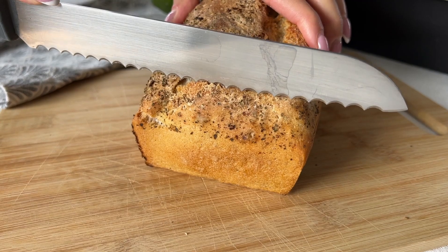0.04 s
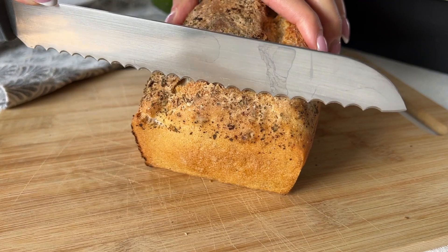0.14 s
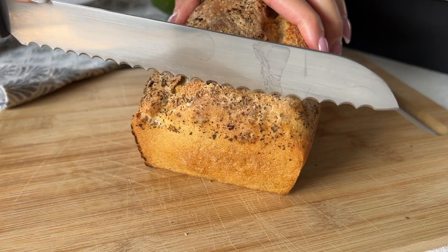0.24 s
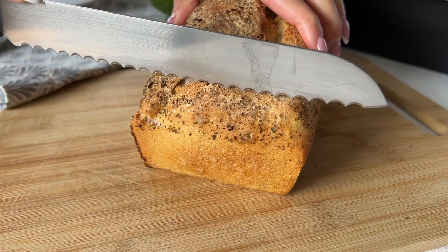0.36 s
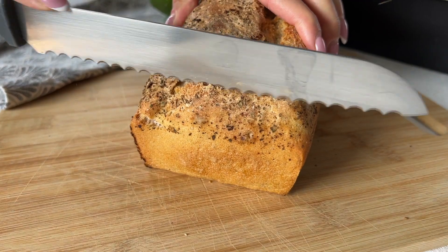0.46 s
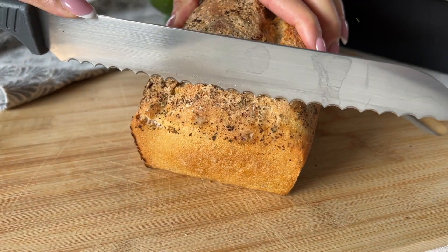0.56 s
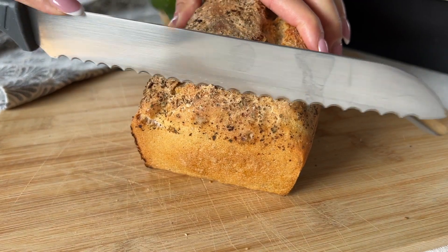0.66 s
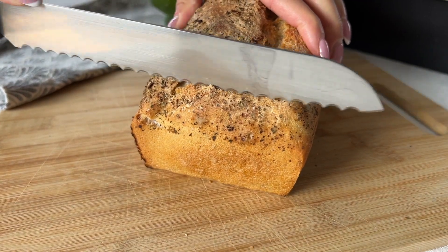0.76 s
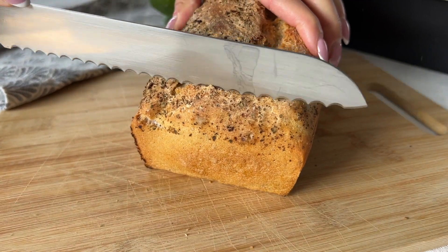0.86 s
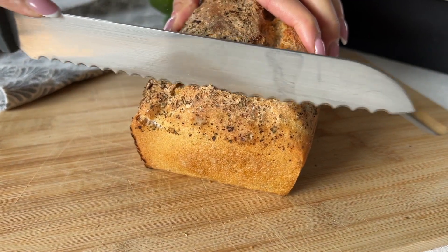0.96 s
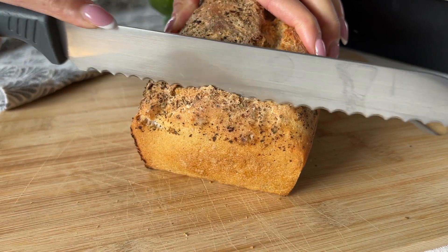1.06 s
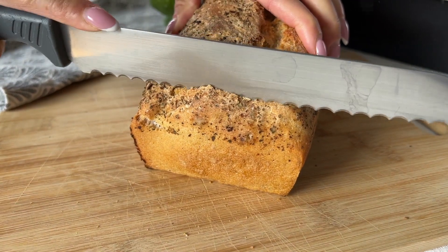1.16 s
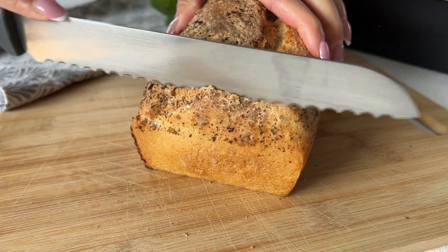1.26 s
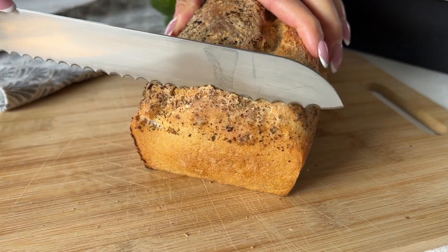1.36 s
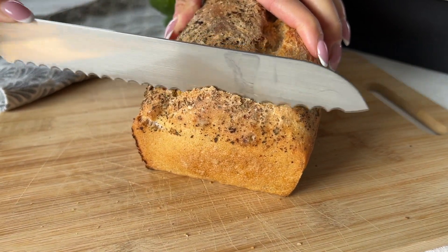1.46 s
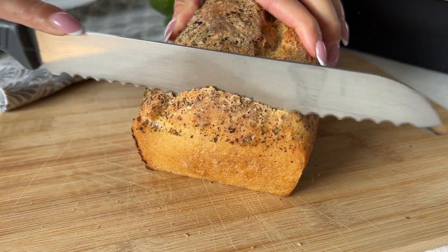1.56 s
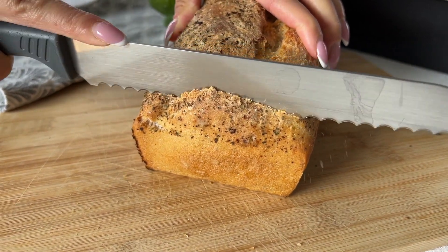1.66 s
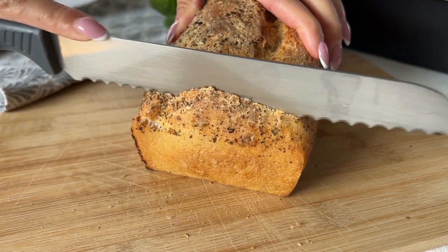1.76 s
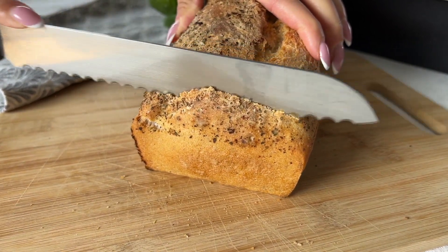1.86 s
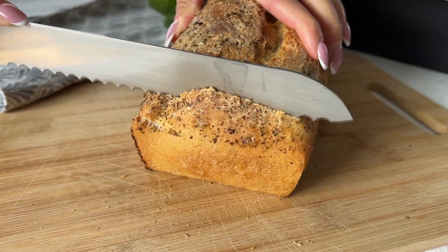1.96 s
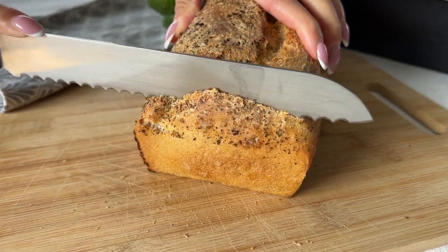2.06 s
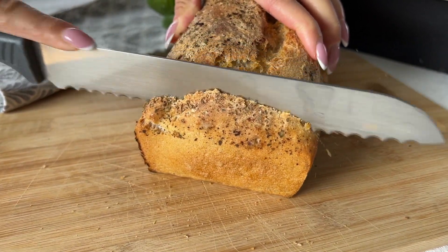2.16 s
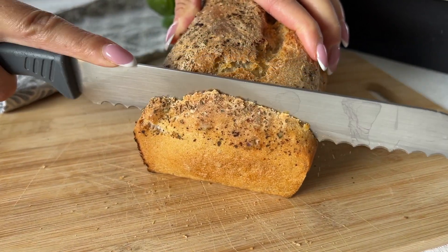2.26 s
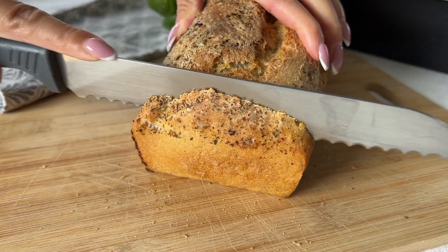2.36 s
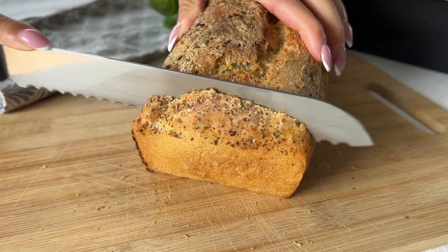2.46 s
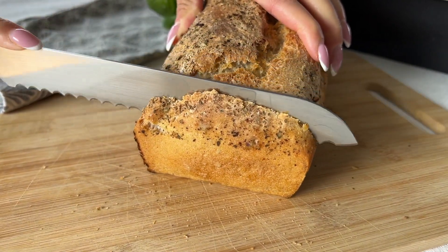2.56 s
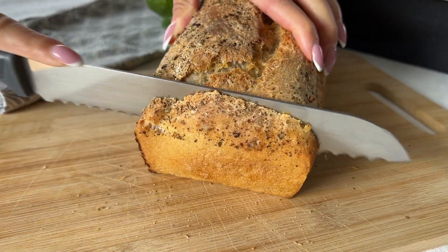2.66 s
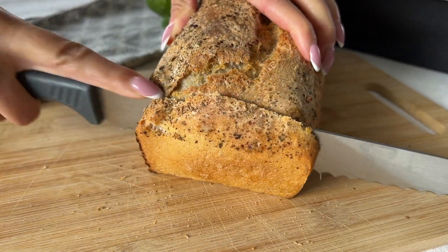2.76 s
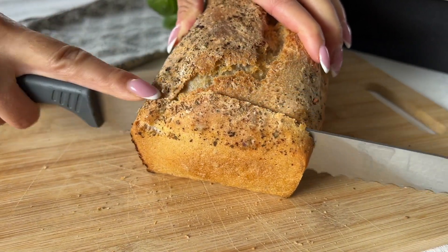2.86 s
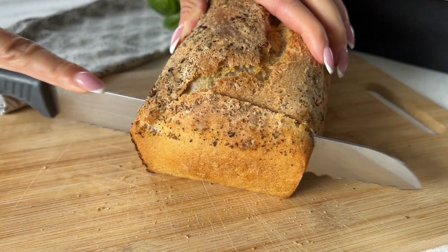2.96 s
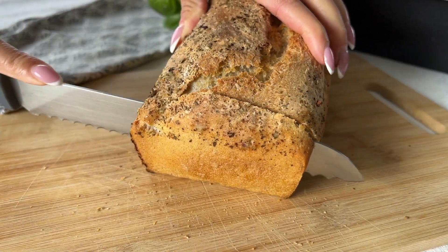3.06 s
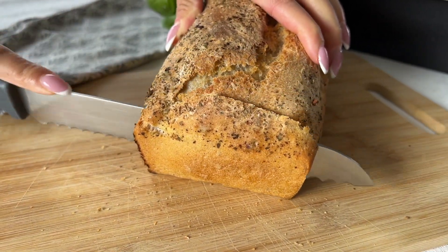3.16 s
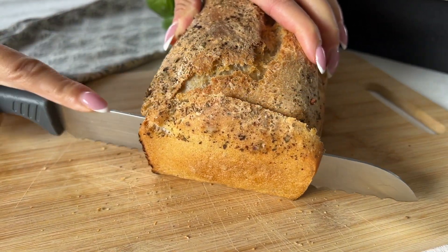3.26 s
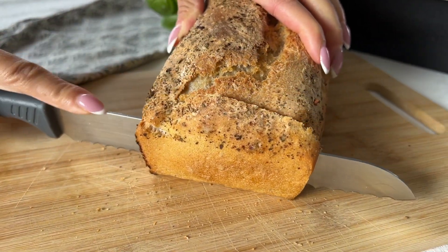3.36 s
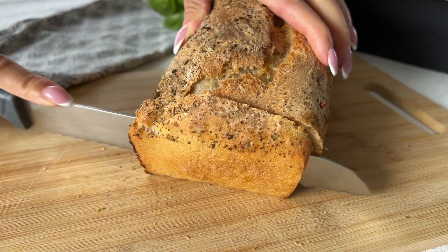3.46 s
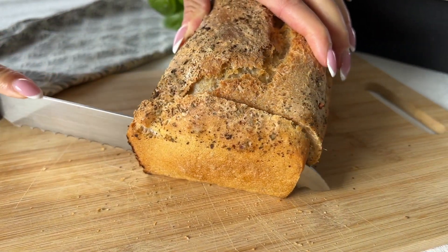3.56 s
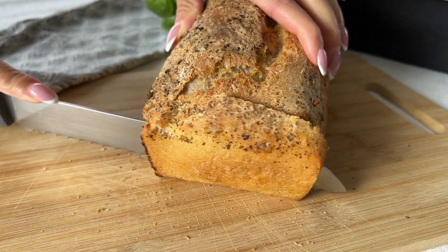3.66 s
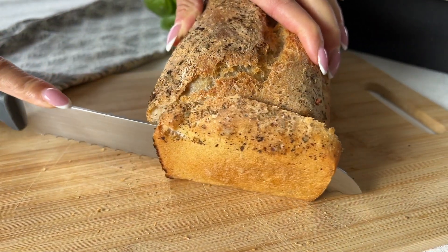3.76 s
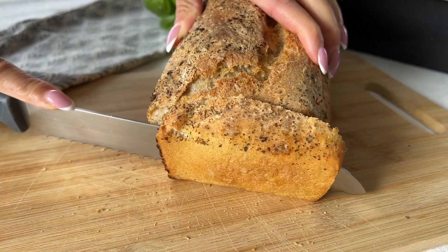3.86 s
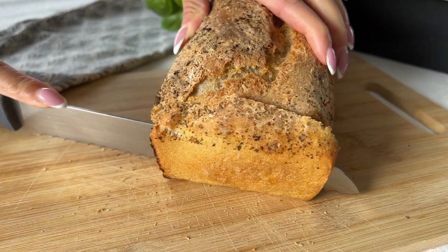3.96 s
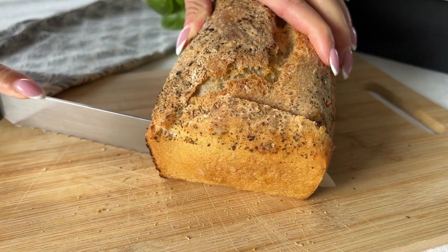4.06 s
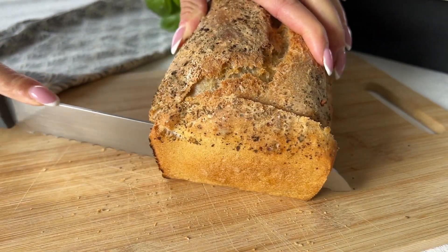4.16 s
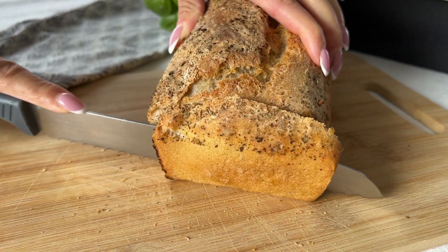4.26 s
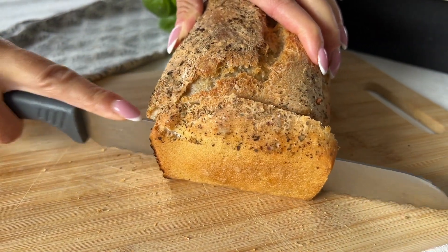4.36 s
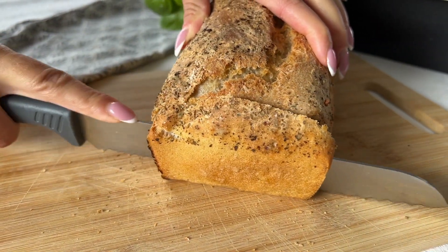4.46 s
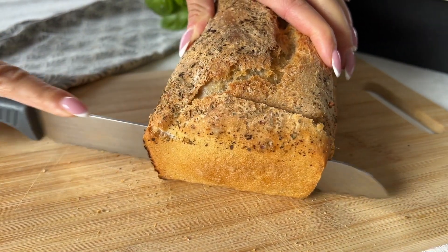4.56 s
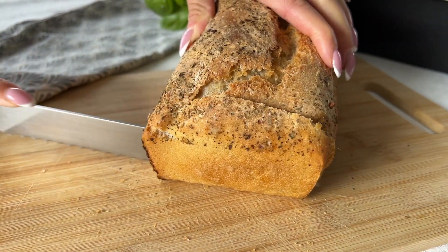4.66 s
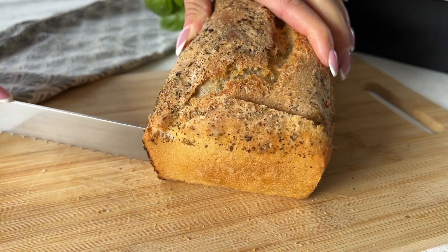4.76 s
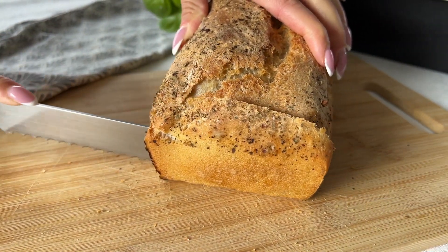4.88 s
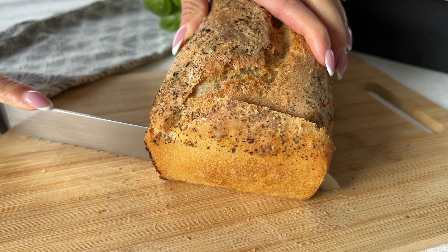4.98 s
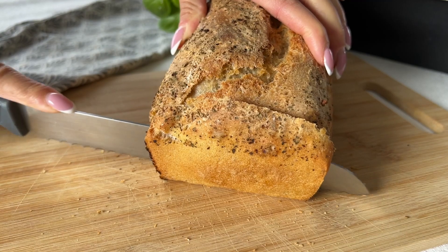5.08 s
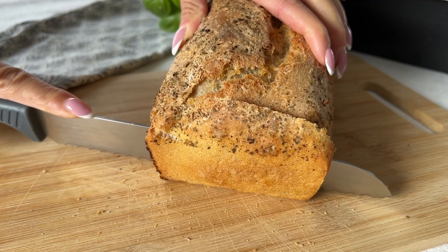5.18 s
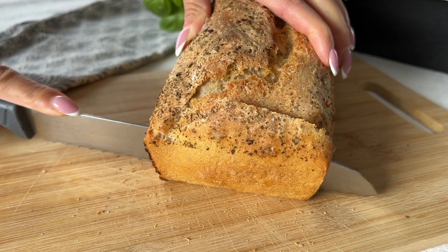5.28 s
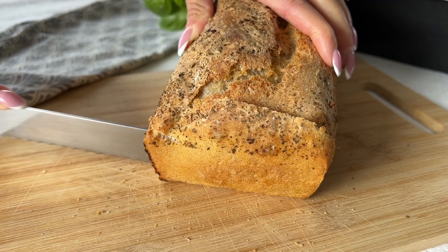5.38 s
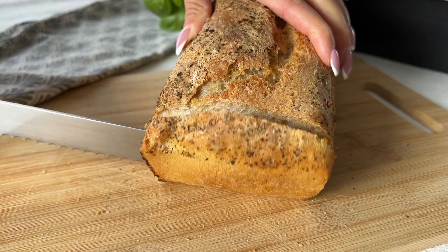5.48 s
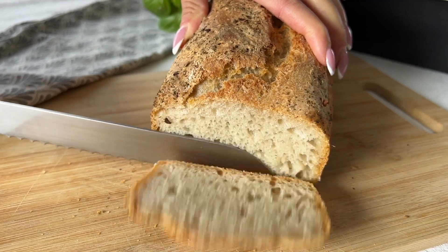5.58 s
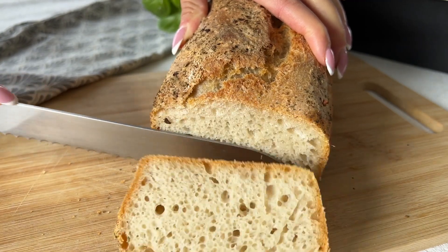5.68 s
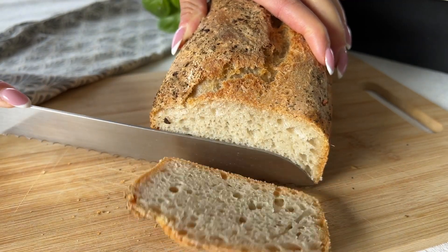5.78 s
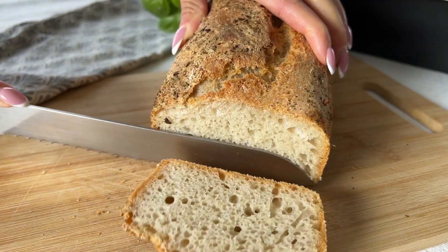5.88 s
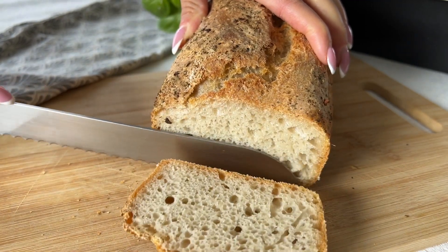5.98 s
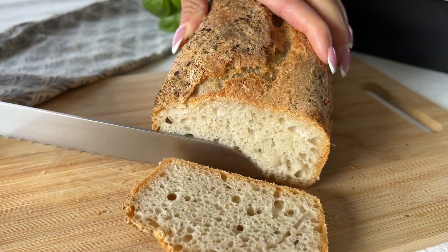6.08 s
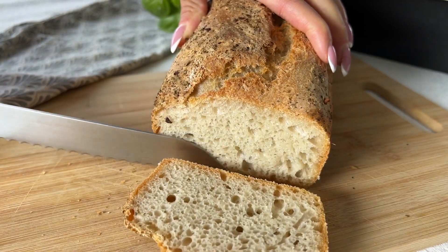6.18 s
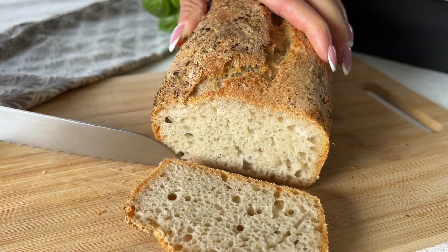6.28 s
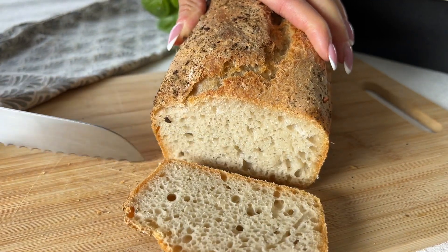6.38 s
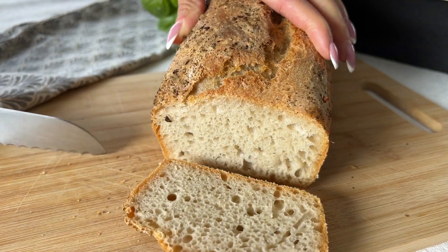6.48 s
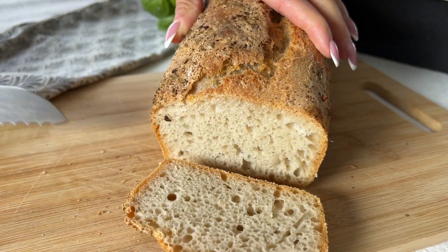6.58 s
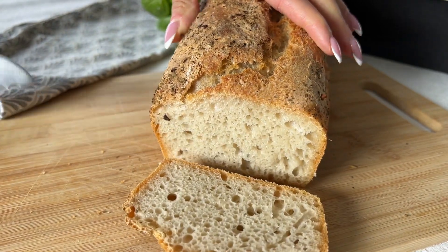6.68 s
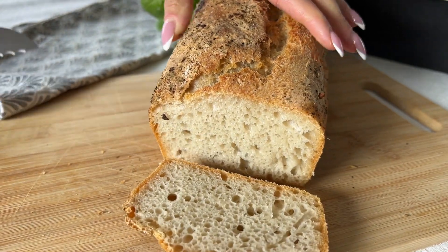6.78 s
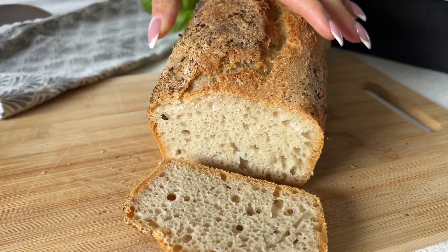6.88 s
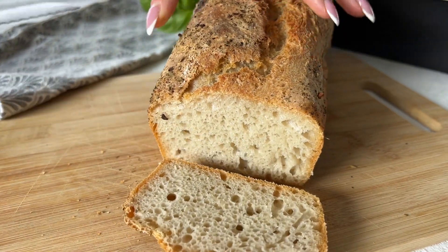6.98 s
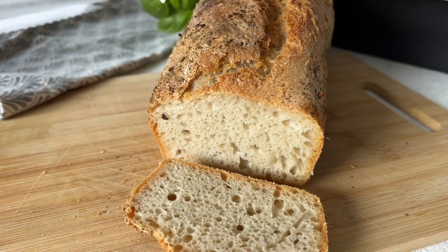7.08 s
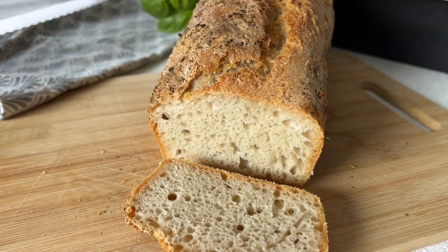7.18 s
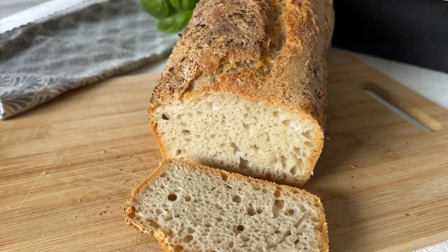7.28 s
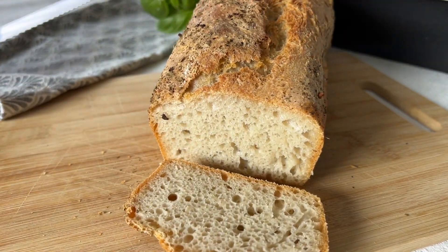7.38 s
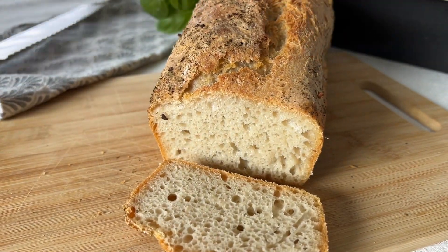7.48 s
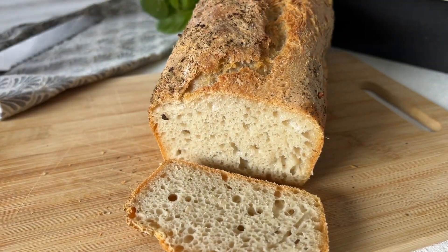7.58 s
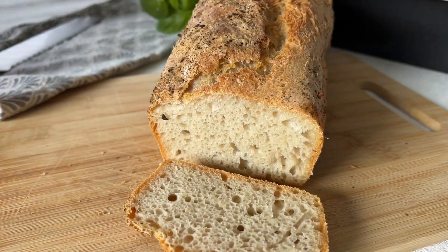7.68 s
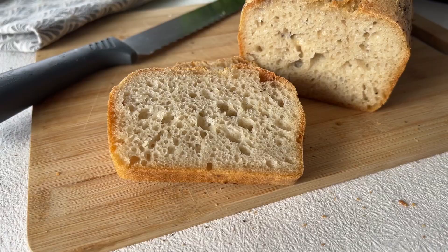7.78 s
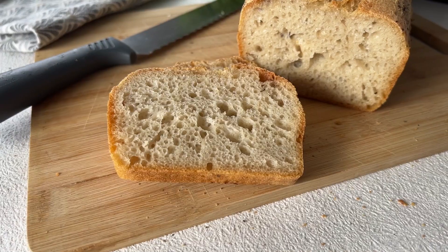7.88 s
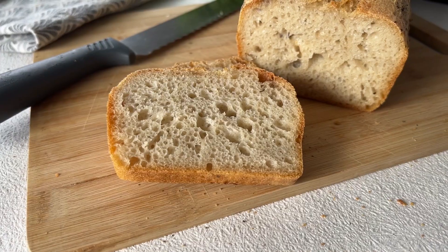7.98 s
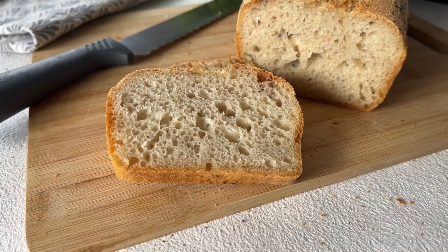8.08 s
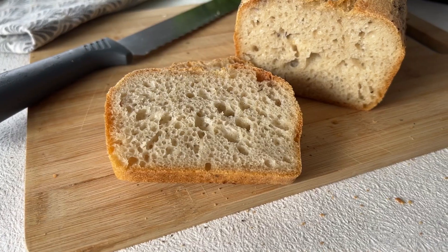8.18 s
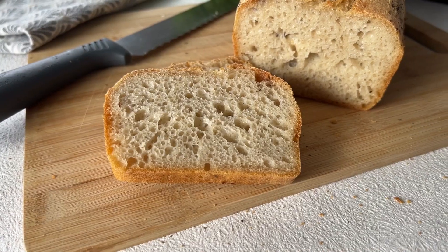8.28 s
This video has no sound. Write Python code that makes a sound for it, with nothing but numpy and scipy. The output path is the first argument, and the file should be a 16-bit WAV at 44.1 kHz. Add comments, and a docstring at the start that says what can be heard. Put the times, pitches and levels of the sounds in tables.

```python
"""In a quiet kitchen, a serrated knife saws a slice off a crusty loaf on a wooden board.
Brittle fracture of the crust gives cracks and crackle; stick-slip friction in the crumb and on the
board gives a rasp that dulls with depth. The blade's resonances change as it is drawn free.
The sawing and a few dull thumps excite low modes of counter and room. A faint hiss lies beneath,
and all sound is cut off shortly before the end."""
import sys
import numpy as np
from scipy import signal
from scipy.io import wavfile
from scipy.ndimage import uniform_filter1d

SR = 44100
rng = np.random.default_rng(int(sys.argv[2]) if len(sys.argv) > 2 else 0)


def store_wav(level_fs):
    """Save 16-bit WAV to argv[1]."""
    pcm = np.round(np.clip(np.atleast_2d(level_fs), -1, 1) * 32767)
    wavfile.write(sys.argv[1], SR, pcm.T.astype(np.int16))


N = 367749

# saw strokes: bite t/s, duration/s, rasp level/dB, crackle level/dB, swell over the stroke/dB
STROKES = [(0.135, 0.028, -69.5, -80, 3), (0.312, 0.0083, -44.5, -52, -10.5),
           (0.404, 0.093, -37.5, -32.5, 3), (0.683, 0.11, -41.5, -48.5, 0),
           (0.918, 0.16, -41.5, -40.5, 0.5), (1.228, 0.1, -36, -42, 0.5), (1.477, 0.17, -42.5, -39, -2.5),
           (1.769, 0.095, -42.5, -44, 6.5), (1.975, 0.034, -58, -59, 13), (2.082, .16, -45, -43, -0.5),
           (2.32, .05, -60.5, -59, -9), (2.4, 0.056, -42, -49, 4.5), (2.626, 0.13, -41.5, -46, -0.5),
           (2.887, 0.15, -52, -59, -1), (3.197, 0.06, -50, -58, 3.5), (3.355, 0.064, -75, -68.5, 14),
           (3.467, 0.049, -46.5, -54.5, 2.5), (3.649, 0.12, -64.5, -61.5, -7),
           (3.985, 0.048, -64, -65.5, -8.5), (4.182, 0.046, -58, -62, 1.5), (4.321, 0.029, -35.5, -43.5, 4),
           (4.509, .2, -38, -50.5, -0.5), (4.83, 0.096, -48, -54.5, 0.5), (5.027, 0.11, -48, -55.5, 4.5),
           (5.334, 0.11, -36.5, -47, -3), (5.578, 0.16, -52.5, -57, 5), (5.999, 0.21, -48.5, -61, 1),
           (6.236, .25, -44, -55, 2.5), (6.558, 0.036, -61, -77, 1.5)]
# path of the blade: t/s, depth (0 top crust, 1 board)
BLADE_DEPTH = [(0, 0.01), (2.4, 0.17), (2.9, 0.46), (3.4, 0.91), (3.9, 0.43), (4.3, 0.91)]
# single cracks of crust: t/s, snap level/dB (before filtering), knock level/dB, knock f/Hz
CRACKS = [(0.0802, -24.5, -37, 1800), (0.2184, -22, -42, 250), (0.2576, -26, -30.5, 604),
          (0.2933, -27, -26.5, 347), (0.3094, -34, -26, 345), (0.3676, -20.5, -32, 630),
          (0.386, -16.5, -38, 638), (0.4155, -16, -41, 640), (0.447, -21, -29.5, 1190),
          (0.4633, -13, -47.5, 608), (0.477, -30, -27.5, 1080), (0.5492, -24.5, -46, 471),
          (0.6404, -42, -42, 589), (0.6599, -14.5, -32, 304), (0.7022, -17.5, -34.5, 1150),
          (0.7492, -22, -23.5, 617), (0.9028, -24, -42, 627), (0.9577, -31, -46, 615),
          (0.9824, -17.5, -44.5, 250), (1.0181, -14, -36, 615), (1.0596, -10.5, -46.5, 650),
          (1.076, -16, -45, 301), (1.0884, -15, -41.5, 490), (1.1767, -40, -33, 250),
          (1.205, -29, -40.5, 907), (1.2322, -30, -32, 799), (1.4331, -15.5, -32, 291),
          (1.4479, -14, -27.5, 1550), (1.4751, -25, -30, 608), (1.486, -11.5, -26.5, 1000),
          (1.5022, -22, -35, 626), (1.5394, -16.5, -24, 580), (1.5813, -18, -25, 350),
          (1.6028, -18, -42, 1020), (1.624, -17, -52, 583), (1.7515, -19.5, -35, 312),
          (1.8148, -20, -37, 570), (1.8282, -23, -34, 1020), (1.8362, -18.5, -35, 500),
          (2.0298, -31, -45, 1160), (2.0749, -28, -35, 353), (2.0892, -17.5, -33, 440),
          (2.123, -20.5, -39, 350), (2.1555, -24, -34, 910), (2.175, -14.5, -29, 1280),
          (2.2072, -20, -46, 455), (2.2306, -23, -32.5, 458), (2.388, -16.5, -24, 2030),
          (2.4397, -33, -54, 1050), (2.4598, -26, -42, 295), (2.5826, -28.5, -40, 385),
          (2.6194, -24, -61, 641), (2.6264, -21, -42, 587), (2.6811, -17.5, -31, 1120),
          (2.6988, -24.5, -32, 611), (2.7868, -30.5, -29.5, 630), (2.8143, -31.5, -41, 2180),
          (2.8754, -39, -32.5, 980), (2.8903, -30.5, -52, 1150), (2.937, -38, -49, 546),
          (2.971, -31, -42, 336), (2.9874, -29.5, -46, 264), (3.052, -37, -65, 283),
          (3.0929, -40, -48.5, 814), (3.21, -27.5, -38, 619), (3.2323, -36, -43, 1070),
          (3.2537, -25.5, -40, 630), (3.463, -35, -53, 689), (3.4914, -36.5, -45, 832),
          (3.6556, -37, -43, 1150), (3.6689, -25.5, -61, 1820), (4.7983, -42, -48, 250),
          (5.5895, -41, -47, 350), (5.7277, -39, -59, 283), (5.8113, -42, -45, 2220),
          (5.8428, -37, -47, 2120), (5.9971, -47, -63, 571), (6.112, -44, -46, 266.5),
          (6.2098, -39, -43, 250), (6.279, -36, -52, 345), (6.6484, -53, -56, 250), (6.6827, -53, -60, 251)]
# friction spectra high in the loaf and down at the board: f/Hz, relative level/dB
RASP_TOP = [(71, -30), (120, -1.5), (210, -3), (418, -4.5), (1030, -4.5), (1390, -9.5), (1810, -8.5),
            (2850, -16), (3440, -13), (5000, -24), (6500, -51), (11000, -120)]
RASP_BOARD = [(71, -64.5), (120, -14.5), (239, 0), (394, -3), (612, -2), (936, -6), (1240, -7),
              (1610, -11.5), (3210, -23), (4000, -26), (5200, -36), (8800, -120)]
# spectra of breaking crust and of steel scraping crumb and wood: f/Hz, relative level/dB
FRACTURE = [(1470, -11), (2500, -7), (4260, -9), (7190, 1.5), (8860, -7), (10300, -6), (11200, -12),
            (11600, -8), (12500, -8), (13800, 0.5), (15800, 3.5)]
SCRAPE = [(1500, -9), (2300, 4.5), (3400, 0.5), (4000, -6), (7500, -6), (9000, -15), (12000, -20),
          (15000, -11), (16000, -28)]
# modes of the loaf on its board and of the blade:
# f/Hz, width/Hz, lift in the crust/dB, lift at the board/dB, lift when drawn free/dB
LOAF_MODES = [(171, 17, 10, .1, 15.8), (226, 40, 8, 7, 1.7), (357, 50, 4, .1, 9.2),
              (621.5, 160, 5.5, 4, 8.2), (716, 47, -6.5, 2, .1), (786, 26, -9.5, 5.7, 7.1),
              (1097, 280, 5, 1.3, 4.4), (1251, 82, -4, 6.8, 2.2), (1400, 66, -4, .1, 13),
              (1586, 66, 0, 4, 7), (1840, 92, -6.5, 6.4, 1)]
BLADE_MODES = [(2250, 190, -0.5, 4.3, 2), (3010, 110, -4.5, .1, 3.7), (3070, 100, -5.5, .1, 7.5),
               (3142, 70, -5, 6.9, 0.085), (3410, 230, 10, 7.6, 0.11), (4330, 90, -0.5, 5, 15),
               (4980, 250, 4.7, 4.6, 2.5), (5520, 170, 8.5, 8.1, 2.5), (6050, 70, 8, 4, 14),
               (6310, 93, 5, 6.2, 11), (6560, 44, 8.5, 8, 3), (7460, 170, 7, 3.3, 12),
               (8000, 60, 6.5, 1.5, 3), (8560, 160, 0.5, 2.6, 6.8), (9700, 150, 7.5, 7.5, 6.3),
               (10500, 170, 3.5, 1.5, 6.5), (11700, 160, 7, 2.8, 3.4), (13740, 300, 2.5, 3, 8),
               (15200, 50, 2.5, .1, 7)]
# dull thumps: t/s, relative level/dB
THUMPS = [(3.979, -34.5), (4.004, -34.5), (4.038, -36.5), (4.065, -41), (7.587, -46.5), (7.656, -44),
          (7.718, -49.5), (7.764, -52)]
# low modes of counter and room: f/Hz, width/Hz, relative level/dB
BOOM_MODES = [(59.4, 12, -18.5), (111.65, 3.2, 0), (140, 8.2, -3.5), (170, 8.5, -7)]
# rumble of the sawing: t/s, level/dB
RUMBLE = [(0.2, -66), (0.52, -53), (3.3, -54.5), (3.8, -66.5), (4.15, -57.5), (5.7, -58), (5.91, -65),
          (6.3, -53.5), (6.71, -68), (7.8, -69.5)]
# spectrum of the kitchen air: f/Hz, relative level/dB
AIR_SPECTRUM = [(21, -47.5), (35, -8.5), (86, -3), (113, -12.5), (221, -12), (251, -19.5), (316, -16.5),
                (475, -20.5), (998, -21), (1190, -25.5), (3320, -32.5), (10800, -47.5), (15800, -42.5)]
# a thin high hiss in the air, and the microphone's resonance: f/Hz, width/Hz, lift/dB
HISS_PEAK = [(15450, 300, 8.5)]
MIC_PEAK = [(16600, 710, 10)]

IN_CRUST, AT_BOARD, DRAWN_FREE = 0, 1, 2  # lift columns of the mode tables


def rasp(level_db, depth, free):
    """Stick-slip friction: teeth tear the crumb and ring loaf, board and blade, duller with depth."""
    coarse = bursts(per_s=150, spread_db=3.5, t60=0.043)
    fine = bursts(per_s=540, spread_db=-2.0, t60=0.03)
    friction = ((1 - depth) * coarse + depth * fine) * rng.standard_normal(N)
    top = colour(friction, RASP_TOP, modes_at(LOAF_MODES, IN_CRUST))
    bottom = held_or_free(friction, RASP_BOARD, free, LOAF_MODES + BLADE_MODES)
    return gain_of(level_db) * ((1 - depth) * top + depth * bottom)


def crackle(level_db, depth, free):
    """Forced vibration: fine fractures drive the blade's modes, giving way to scraping with depth."""
    fractures = bursts(per_s=170, spread_db=4.0, t60=0.024) * rng.standard_normal(N)
    scrape = bursts(per_s=600, spread_db=1.5, t60=0.03) * rng.standard_normal(N)
    top = colour(fractures, FRACTURE, modes_at(BLADE_MODES, IN_CRUST))
    bottom = held_or_free(scrape, SCRAPE, free, BLADE_MODES)
    return gain_of(level_db) * ((1 - depth) * top + depth * bottom)


def stroke_levels():
    """Power addition: rasp and crackle levels in dB, each the sum of all strokes and a faint rub."""
    t = np.arange(N) / SR
    touching = (t > STROKES[0][0]) & (t < sum(STROKES[-1][:2]))
    rasp_power, crackle_power = (touching * gain_of(2 * rub_db) + 1e-12 for rub_db in (-65.5, -85.5))
    for bite, duration, rasp_db, crackle_db, swell_db in STROKES:
        early, late = np.maximum(bite - t, 0), np.maximum(t - bite - duration, 0)
        swell = swell_db * (np.clip((t - bite) / duration, 0, 1) - 0.5)
        rasp_power += gain_of(2 * (rasp_db + swell - 375 * early - 256 * late))  # slopes in dB/s
        crackle_power += gain_of(2 * (crackle_db + swell - 370 * early - 360 * late))
    return 10 * np.log10(rasp_power), 10 * np.log10(crackle_power)


def cracks(depth, rise_s=0.00067, ping_low_hz=3500, ping_high_hz=13940, ping_width_hz=500):
    """Brittle fracture: each crack is a snap, the ping of a flake and a damped knock in the loaf."""
    t = np.arange(1500) / SR
    snaps, rings = np.zeros((2, N + len(t)))
    envelope = (gain_of(-60 * t / 0.006) + 1.5 * gain_of(-60 * t / 0.018)) * np.minimum(t / rise_s, 1)
    noises, flakes = rng.standard_normal((len(CRACKS), 2, len(t))), rng.random(len(CRACKS))
    for (start, snap_db, knock_db, hz), noise, flake in zip(CRACKS, noises, flakes):
        span = slice(round(start * SR), round(start * SR) + len(t))
        snap = noise[0] * envelope
        snaps[span] += gain_of(snap_db) * snap / abs(snap).max()
        pole = np.exp(-np.pi * (0.12 * hz + 170) / SR)  # damped within a few cycles
        push = noise[1] * gain_of(-60 * t / 0.025)
        knock = signal.lfilter([1, 0, -1], [1, -2 * pole * np.cos(2 * np.pi * hz / SR), pole ** 2], push)
        ping_hz = ping_low_hz * (ping_high_hz / ping_low_hz) ** flake
        ping = np.exp(-np.pi * ping_width_hz * t) * np.sin(2 * np.pi * ping_hz * t)
        rings[span] += gain_of(knock_db) * knock / abs(knock).max() + gain_of(snap_db - 11) * ping
    dull = 0.81 * depth  # snaps deep in the cut lose treble
    return colour(snaps[:N] * (1 - dull), FRACTURE) + colour(snaps[:N] * dull, SCRAPE) + rings[:N]


def crumb_ticks(crackle_db, depth, t60=0.006):
    """Shot noise: loose crumbs snap at random, following the smoothed level of the crackle."""
    t = np.arange(600) / SR
    activity = gain_of(uniform_filter1d(crackle_db, SR // 5) - 6)
    snaps = activity * impulses(per_s=130, spread_db=7, max_spreads=3)
    ticks = signal.oaconvolve(snaps, gain_of(-60 * t / t60))[:N] * rng.standard_normal(N)
    return colour(ticks * (1 - depth), FRACTURE) + colour(ticks * depth, SCRAPE)


def boom(level_db, hand_damping_hz=6):
    """Modal resonance: counter and room ring low, shaken by the sawing and struck by rattling thumps."""
    t = np.arange(SR) / SR
    jolts = bursts(per_s=74, spread_db=-0.5, t60=0.065) * rng.standard_normal(N)
    blows, shaken, struck = np.zeros((3, N))
    for start, db in THUMPS:
        blows[round(start * SR)] = gain_of(db)
    soft_blows = signal.oaconvolve(blows, np.hanning(260))[:N]
    for hz, width, db in BOOM_MODES:
        ring = gain_of(db) * np.exp(-np.pi * width * t) * np.sin(2 * np.pi * hz * t)
        held = ring * np.exp(-np.pi * hand_damping_hz * t)  # hands rest on loaf and board
        shaken += signal.oaconvolve(jolts, held * np.sqrt(width + hand_damping_hz))[:N]
        struck += signal.oaconvolve(soft_blows, ring)[:N]
    shaken /= np.sqrt(np.mean(shaken ** 2))
    rattle = rng.standard_normal(N) * signal.oaconvolve(blows, gain_of(-60 * t / 0.13))[:N]
    rattle = colour(rattle, [(100, -23), (200, 17), (400, -2), (700, 11.5), (900, -15), (4000, -57)])
    return gain_of(level_db) * shaken + gain_of(-42.5) * struck + gain_of(-16.5) * rattle


def kitchen_reverb(x):
    """Reverberation: sparse reflections of random sign, with the treble absorbed first."""
    reflections = np.zeros(SR // 2)
    slots = np.arange(200, len(reflections) - 20, 20)
    reflections[slots + rng.integers(0, 20, len(slots))] = rng.choice([-1., 1.], len(slots))
    hz, t, spectra = signal.stft(reflections, SR, nperseg=256)
    t60 = np.interp(hz, [0, 2000, 16000], [0.4, 0.3, 0.15])[:, None]
    tail = signal.istft(spectra * gain_of(-60 * t / t60), SR, nperseg=256)[1]
    return signal.oaconvolve(x, tail / np.linalg.norm(tail))[:N]


def kitchen_air():
    """Stationary noise: a low murmur with a thin high hiss."""
    return gain_of(-65) * colour(rng.standard_normal(N), AIR_SPECTRUM, HISS_PEAK)


def gain_of(db):
    """Decibel law: the amplitude ratio for a level."""
    return 10 ** (np.asarray(db) / 20)


def curve(rows):
    """Linear interpolation of (t/s, value) rows at every sample."""
    return np.interp(np.arange(N) / SR, *np.transpose(rows))


def impulses(per_s, spread_db, max_spreads):
    """Poisson process: impulses whose levels follow a capped exponential distribution."""
    sizes = gain_of(spread_db * np.minimum(rng.exponential(1, N), max_spreads))
    return sizes * (rng.random(N) < per_s / SR)


def bursts(per_s, spread_db, t60):
    """Exponential decay: an envelope of sudden random slips, each falling 60 dB in t60 seconds."""
    slips = impulses(per_s, spread_db, max_spreads=4)
    power = signal.lfilter([1], [1, -gain_of(-2 * 60 / (t60 * SR))], slips ** 2)
    local_mean = uniform_filter1d(power, SR // 12) + 1e-9 * power.mean()
    return np.sqrt(power / local_mean + 0.081)


def colour(x, spectrum, modes=()):
    """Minimum-phase filter of unit power gain: a smooth spectrum with resonant peaks and dips."""
    hz = abs(np.fft.fftfreq(8192, 1 / SR))
    corner_hz, corner_db = np.transpose(spectrum)
    db = np.interp(np.log(hz + 1), np.log(corner_hz + 1), corner_db)
    db += sum(lift_db / (1 + (2 * (hz - centre) / width) ** 2) for centre, width, lift_db in modes)
    log_gain = np.log(gain_of(np.maximum(db, -100)))
    phase = -signal.hilbert(log_gain).imag
    taps = np.fft.ifft(np.exp(log_gain + 1j * phase)).real[:4096]
    return signal.oaconvolve(x, taps / np.linalg.norm(taps))[:N]


def modes_at(modes, place):
    """Modal weighting: each mode's lift for one place of the blade."""
    return [(hz, width, lifts_db[place]) for hz, width, *lifts_db in modes]


def held_or_free(drive, spectrum, free, modes):
    """Boundary conditions: other modes stand out once the loaf lets go of the blade."""
    held = colour(drive, spectrum, modes_at(modes, AT_BOARD))
    loose = colour(drive, spectrum, modes_at(modes, DRAWN_FREE))
    return (1 - free) * held + free * loose


def scene(release_at_s=6.2, release_s=0.13):
    """Superposition of the knife, its reverberation, the boom and the air in one channel."""
    rasp_db, crackle_db = stroke_levels()
    depth = curve(BLADE_DEPTH)
    free = np.clip((np.arange(N) / SR - release_at_s) / release_s, 0, 1)
    knife = rasp(rasp_db, depth, free) + crackle(crackle_db, depth, free)
    knife += cracks(depth) + crumb_ticks(crackle_db, depth)
    air = kitchen_air()
    return (knife + gain_of(-12.5) * kitchen_reverb(knife) + boom(curve(RUMBLE)) + air)[None]


def record(dry, end_s=7.818, fade_s=0.0026, edge_hz=15900):
    """Frequency response: a small microphone thins deep bass and lifts the top; then fade and low-pass."""
    heard = colour(dry[0], [(20, -22), (50, 0.5), (16000, 0.5)], MIC_PEAK)[None]
    fade = np.clip((end_s - np.arange(N) / SR) / fade_s, 0, 1)
    low_pass = signal.firwin(511, edge_hz, window=("kaiser", 9), fs=SR)
    return signal.oaconvolve(heard * fade, low_pass[None], "same")


dry = scene()
out = record(dry)
store_wav(out)
```